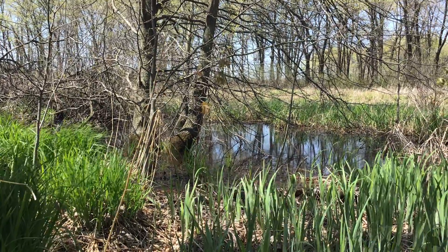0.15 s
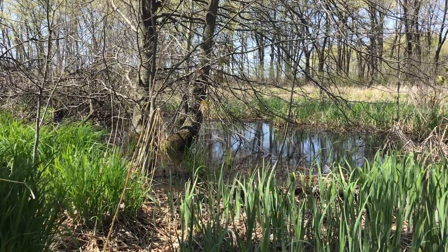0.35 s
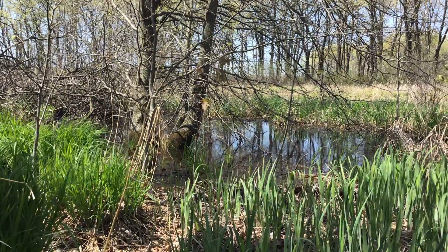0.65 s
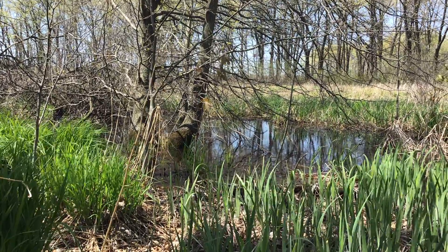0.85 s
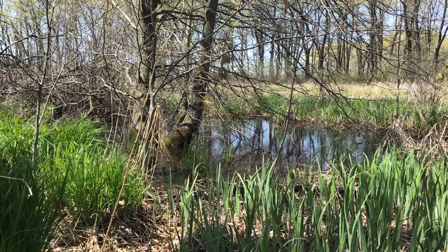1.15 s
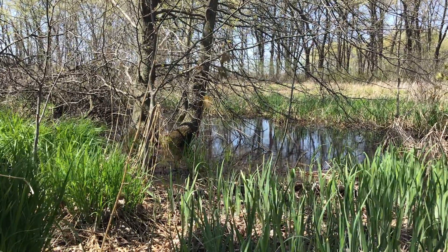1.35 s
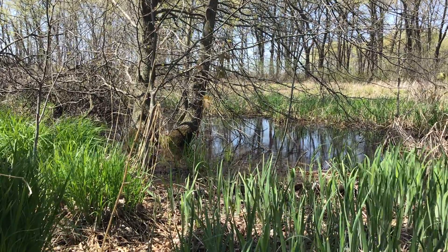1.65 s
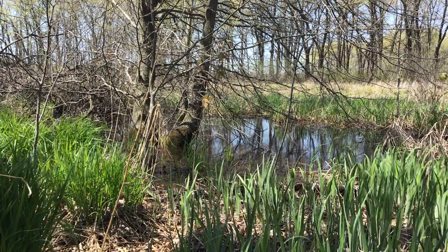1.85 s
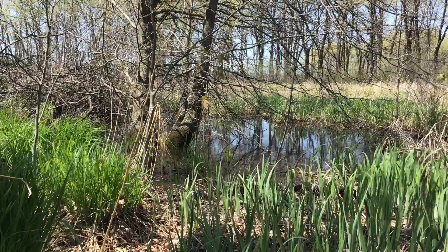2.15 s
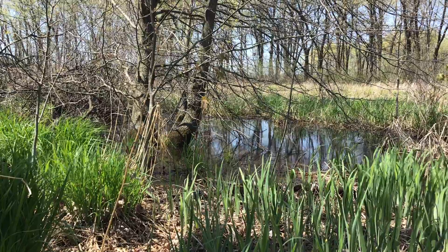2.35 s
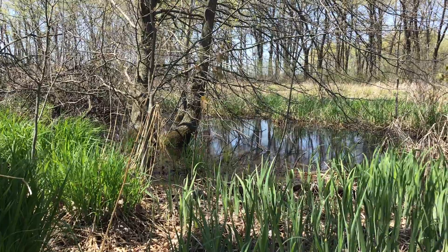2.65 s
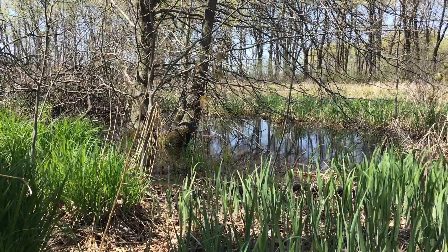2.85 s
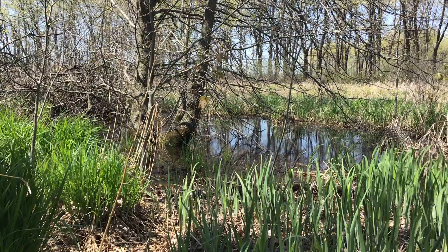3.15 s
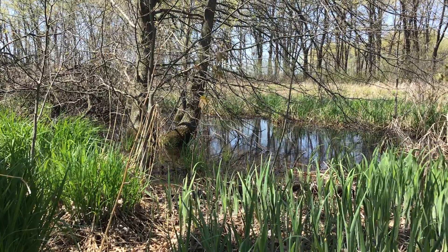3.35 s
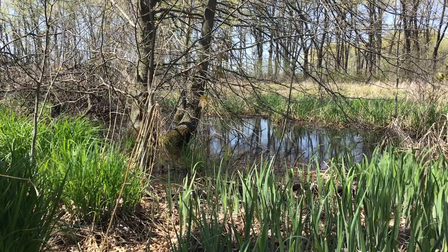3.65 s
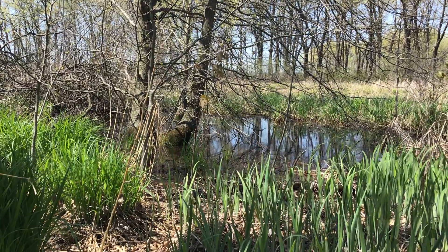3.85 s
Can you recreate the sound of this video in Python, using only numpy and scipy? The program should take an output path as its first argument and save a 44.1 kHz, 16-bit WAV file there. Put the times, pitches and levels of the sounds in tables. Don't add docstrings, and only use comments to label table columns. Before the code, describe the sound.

Outdoors at a pond edge, ratchety frog creaks come three times, each answered by another frog, above a blurred far chorus, brief bird twitters, leaf hiss, faint traffic and low microphone wind, strongest early.

```python
import sys
import numpy as np
from scipy import signal
from scipy.fft import rfft, irfft
from scipy.io import wavfile
from scipy.ndimage import uniform_filter1d

SR = 44100
rng = np.random.default_rng(int(sys.argv[2]) if len(sys.argv) > 2 else 0)


def natural_amplitude(level_db):
    exponent = np.asarray(level_db, float) / 20
    return 10 ** exponent


def put_to_file(sound):
    columns = np.atleast_2d(sound).T
    safe = np.clip(columns, -1, 1)
    whole_steps = np.round(safe * 32767)
    wavfile.write(sys.argv[1], SR, whole_steps.astype(np.int16))


N = 176400
LEAD_S = 0.5


def rms_one(x):
    return x / np.sqrt(np.mean(x ** 2) + 1e-20)


def in_time(rows):
    return np.interp(np.arange(N) / SR, *np.transpose(rows))


def band(x, low_hz, high_hz):
    edges_hz = [low_hz, min(high_hz, .48 * SR)]
    return signal.sosfilt(signal.butter(2, edges_hz, "band", fs=SR, output="sos"), x)


def drift(rate):
    every = 40
    r = np.exp(-2 * np.pi * every * rate / SR)
    slow = signal.lfilter([1], [1, -2 * r, r * r], rng.standard_normal(N // every + 2002))[2000:]
    return np.interp(np.arange(N) / every, np.arange(len(slow)), rms_one(slow))


def add(out, s, sound):
    i = int((s + LEAD_S) * SR)
    out[i:i + len(sound)] += sound


def coloured(spectrum):
    hz, db = np.transpose(spectrum)
    grid = np.log(np.arange(N // 2 + 1) * SR / N + 1)
    gain = natural_amplitude(np.interp(grid, np.log(hz), db, left=-60, right=-60))
    return rms_one(irfft(rfft(rng.standard_normal(N)) * gain, N))


def trees(x, t60):
    t = np.arange(SR // 2) / SR
    tail = rng.standard_normal(len(t)) * natural_amplitude(-60 * t / t60) * np.clip(t / .004, 0, 1)
    return signal.fftconvolve(x, tail / np.sqrt(np.sum(tail ** 2)))[:len(x)]


def glide(hz):
    return np.sin(2 * np.pi * np.cumsum(hz) / SR)


# middle in seconds, half length in seconds, level in dB, centre in Hz.
PUFFS = [(0.046, 0.021, -33, 165), (0.074, 0.028, -32, 110), (0.185, 0.041, -39, 133),
         (0.288, 0.021, -27.5, 110), (0.368, 0.025, -24.5, 110), (0.448, 0.025, -34.5, 186),
         (0.477, 0.031, -26.5, 98.4), (0.544, 0.035, -31.5, 110), (.632, .014, -25, 225),
         (0.647, 0.032, -23, 82), (0.852, 0.047, -31, 76.4), (0.919, 0.034, -32.5, 120),
         (0.984, 0.014, -28, 84), (1.036, 0.027, -33.5, 248), (1.08, 0.081, -27.5, 95.4),
         (1.086, 0.02, -39.5, 420), (1.268, 0.03, -34, 119), (1.412, 0.052, -35.5, 101),
         (1.51, 0.11, -42.5, 144), (1.604, 0.033, -32, 127), (1.686, 0.026, -28.5, 88),
         (1.747, 0.019, -32.5, 110), (1.824, 0.037, -39, 90), (2.26, 0.025, -35.5, 187),
         (2.299, 0.018, -31.5, 90), (2.389, 0.024, -24, 110), (2.421, 0.0088, -26, 210),
         (2.468, 0.023, -27.5, 83), (3.472, 0.021, -35.5, 89), (3.557, 0.018, -26.5, 108),
         (0.628, 0.0086, -39, 520), (0.641, 0.013, -38.5, 400), (2.11, 0.036, -46.5, 168),
         (3.056, 0.042, -42.5, 75), (3.143, .025, -43, 85), (3.99, 0.026, -38.5, 70)]
# time in seconds, level in dB.
BREEZE = [(0, -39), (.6, -46.5), (.75, -47), (.85, -55), (1.0, -39), (1.35, -51.5), (1.7, -53), (2.0, -54),
          (2.4, -49), (2.56, -54), (2.7, -54.5), (3.1, -51), (3.4, -53.5), (4, -49.5)]


def wind():
    breeze_tilt_db, lump_db, knee_hz = -8, 3, 110
    below_db, above_db, top_hz = 5, 10, 744
    t, out = np.arange(N) / SR, np.zeros(N)
    lumps, breeze_db = drift(21.4), in_time(BREEZE)
    for low in 40 * 2 ** np.arange(0, 4.5, .5):
        middle_hz = low * 2 ** .25
        noise = band(rng.standard_normal(N + SR), low, low * 2 ** .5)[SR:]
        envelope = np.sqrt(uniform_filter1d(noise ** 2, size=int(3 * SR / low)))
        noise = rms_one(noise / (envelope + .2 * noise.std()))
        octaves = max(np.log2(middle_hz / knee_hz), 0)
        unrest_db = lump_db * 2 * np.tanh((lumps + 0.31 * drift(29)) / 2)
        power = natural_amplitude(2 * (breeze_db + breeze_tilt_db * octaves + unrest_db))
        for middle, half, db, hz in PUFFS:
            away = np.log2(middle_hz / hz)
            loss_db = above_db * away ** 1.79 if away > 0 else below_db * away ** 2
            near = slice(max(int((middle - 3 * half) * SR), 0), int((middle + 3 * half) * SR))
            power[near] += natural_amplitude(2 * (db - loss_db)) * np.exp(-2 * ((t[near] - middle) / half) ** 2)
        out += natural_amplitude(-7.5) * np.sqrt(power) * noise
    return signal.sosfilt(signal.butter(8, top_hz, fs=SR, output="sos"), out)


# frequency in Hz, density in dB per Hz.
TRAFFIC = [(35, -34), (60, -0.5), (114, -2.5), (226, -13), (346, -16), (401, -16.5), (613, -18),
           (3000, -32), (3900, -36), (6600, -120)]


def far_traffic():
    level_db = -51 + 0.39 * drift(1.4)
    return natural_amplitude(level_db) * coloured(TRAFFIC)


# frequency in Hz, density in dB per Hz.
HISS = [(1500, -20), (3000, -4), (4300, -0.5), (6000, -6), (7000, -8), (9500, -7.5), (12000, -14),
        (16000, -12)]
# time in seconds, gain in dB.
LEAVES = [(0, 3.5), (.9, 1), (1.1, -0.4), (4, -1)]


def leaf_hiss():
    hiss = coloured(HISS)
    high = band(hiss, 7000, 20000)
    rustle = natural_amplitude(in_time(LEAVES) + .8 * drift(25)) - 1
    return natural_amplitude(-71.5 + 0.2 * drift(7.1)) * (hiss + rustle * high)


def pulse(db, hz, luck, ring=1.0):
    rise_s, fall_s, sag_hz, sag_s = 0.0021, 0.0015, 653, 0.0014
    tail_share, tail_s = 0.58, 0.0049
    t = np.arange(1300) / SR
    swell = np.sin(np.pi / 2 * np.minimum(t / rise_s, 1)) ** 2
    late = np.maximum(t - rise_s, 0)
    turns = hz * t + sag_hz * sag_s * (1 - np.exp(-t / sag_s))
    beat = (1 - tail_share) * np.exp(-(late / fall_s) ** 2)
    tail = tail_share * np.exp(-late / (ring * tail_s))
    overtone = natural_amplitude(-18 + 1.8 * luck[0]) * np.exp(-late / 0.00045)
    overtone = overtone * np.sin(2 * np.pi * (5250 + 70 * luck[1]) * t)
    return natural_amplitude(db) * swell * ((beat + tail) * np.sin(2 * np.pi * turns) + overtone)


def sac_pitch(s, end_s, call_s, low_hz, rise_hz):
    part = max(1 - (end_s - s) / call_s, 0)
    return low_hz + rise_hz * part ** 2.15


# start in seconds, length in seconds, level in dB, first pitch in Hz, last pitch in Hz.
FAR_CALLS = [
    (-.3, .55, -59, 3200, 3590),
    (0.779, .25, -64.5, 3420, 3360),
    (1.02, .25, -60, 3320, 3660),
    (1.169, .29, -59, 3320, 3560),
    (2.018, 0.48, -64.5, 3270, 3450),
    (2.44, .26, -57.5, 3520, 3720),
    (2.959, .36, -61, 3160, 3330),
    (3.26, .25, -65, 3370, 3300),
    (3.561, 0.43, -62, 3410, 3630),
]


def far_frogs():
    gap_s, slowing, spread_hz = .011, .5, 75
    out = np.zeros(N + 2 * SR)
    luck = rng.standard_normal((len(FAR_CALLS), 50, 3))
    for (start, length, db, first_hz, last_hz), draws in zip(FAR_CALLS, luck):
        s = 0
        for timing, strength, tuning in draws:
            part = s / length
            if part < 1:
                level_db = db + 4 * np.log10(np.sin(np.pi * part) + 0.098) + 1.4 * strength
                hz = first_hz + (last_hz - first_hz) * part + spread_hz * tuning
                add(out, start + s, pulse(level_db, hz, (tuning, timing), 0.69))
            s += gap_s * (1 + slowing * part) * np.exp(.3 * timing)
    out = out[:N + SR]
    return natural_amplitude(-5.5) * out + trees(out, 0.28)


# time in seconds, peak in dB, pitch in Hz.
THIRD = [(.006, -55, 3500), (.0278, -55, 3440), (.0443, -56, 3560), (.0657, -55.5, 3630),
         (.1296, -55, 3510), (.182, -61, 3560), (1.1674, -60, 3700), (1.2787, -62, 3500),
         (1.3366, -61, 3560), (1.368, -57, 3520), (1.4044, -58, 3560), (1.4383, -58, 3560),
         (2.511, -52, 3640), (2.5649, -57, 3600), (2.6397, -67, 3650), (2.6627, -67, 3800),
         (2.7026, -67, 3700), (3.7196, -60, 3600), (3.7401, -61, 3600), (3.772, -60, 3460),
         (3.8309, -59, 3570), (3.8488, -62, 3600), (3.9281, -64, 3650), (3.9541, -62, 3600),
         (3.972, -57, 3860)]


def third_frog():
    out = np.zeros(N + SR)
    for s, db, hz in THIRD:
        add(out, s, pulse(db, hz, rng.standard_normal(2)))
    return out


# start in seconds, length in seconds, level in dB, centre in Hz,
# width in Hz.
RASPS = [(1.1, 0.02, -63.5, 4300, 2600), (1.058, 0.013, -59.5, 4200, 650), (1.085, 0.05, -68, 3940, 1400),
         (1.076, .014, -61, 2540, 710), (.855, 0.015, -71, 5400, 900), (1.033, 0.004, -74, 11000, 4000),
         (.77, 0.035, -76, 10000, 4000), (1.597, .004, -72, 8800, 2500), (3.1, 0.099, -71, 4500, 1800),
         (0.302, 0.005, -69, 10600, 3500), (.359, .004, -66.5, 9000, 2000), (1.158, .006, -72, 7800, 1200),
         (.86, .03, -77, 13500, 2800), (1.57, 0.066, -79, 7000, 2500)]


def rasps_and_ticks():
    out = np.zeros(N + SR)
    for start, length, db, hz, width_hz in RASPS:
        n = int(np.clip(length, .003, .1) * SR)
        swell = np.sin(np.linspace(0, np.pi, n)) ** 0.31
        noise = rms_one(band(rng.standard_normal(6000), hz - width_hz / 2, hz + width_hz / 2))
        add(out, start, natural_amplitude(db) * swell * noise[-n:])
    return out


# time in seconds, peak in dB.
CALL_A = [(0.338, -52), (0.3686, -53), (0.4, -51), (0.4337, -47.5), (0.4699, -45), (0.5086, -42.5),
          (0.5498, -44), (0.5938, -41), (0.6433, -39), (0.692, -40), (0.7415, -42.5), (0.7863, -46.5)]
CALL_B = [(1.552, -50), (1.5828, -50.5), (1.6144, -47), (1.648, -48.5), (1.685, -49), (1.724, -46.5),
          (1.7657, -43), (1.8107, -41), (1.8586, -38.5), (1.909, -39), (1.959, -42), (2.0078, -42)]
CALL_C = [
    (2.948, -53),
    (2.988, -53),
    (3.0317, -48.5),
    (3.0789, -49.5),
    (3.1313, -48),
    (3.1828, -45),
    (3.2345, -47.5),
    (3.282, -54.5),
]


def near_frog():
    out = np.zeros(N + SR)
    for call in CALL_A, CALL_B, CALL_C:
        loudest = max(db for s, db in call)
        for s, db in call:
            hz = sac_pitch(s, call[-1][0], 0.54, 3148, 345)
            ring = .5 + 0.76 * natural_amplitude(db - loudest) / 2
            add(out, s, pulse(db, hz, rng.standard_normal(2), ring))
    return out


# time in seconds, peak in dB.
ANSWERS = [
    [(0.9849, -63), (1.0113, -59), (1.0333, -60), (1.0707, -52), (1.1086, -57), (1.149, -55), (1.1964, -60),
     (1.2313, -51.5)],
    [(2.1448, -67), (2.1688, -63), (2.1937, -65), (2.2192, -59), (2.2486, -55), (2.281, -57), (2.3174, -54),
     (2.3569, -50), (2.3993, -52), (2.4412, -48.5), (2.4786, -53)],
    [(3.4288, -61), (3.4562, -58), (3.4871, -66), (3.5196, -57.5), (3.557, -55), (3.5984, -58),
     (3.6428, -53), (3.6847, -55)],
]


def answering_frog():
    out = np.zeros(N + SR)
    for call in ANSWERS:
        for s, db in call:
            hz = sac_pitch(s, call[-1][0], 0.38, 3320, 192)
            add(out, s, pulse(db, hz, rng.standard_normal(2), 0.99))
    return out


# delay in seconds, level in dB.
REED_ECHOES = [
    (.017, -17),
    (.024, -19),
    (.037, -16.5),
    (.043, -14.5),
]


def pond_echoes(frogs):
    dull = band(frogs, 3200, 3470)
    echoes = sum(natural_amplitude(db) * np.roll(dull, int(s * SR)) for s, db in REED_ECHOES)
    return frogs + echoes + natural_amplitude(-11) * trees(frogs, 0.89)


def sweep(length, db, first_hz, last_hz):
    part = np.linspace(0, 1, int(length * SR))
    return natural_amplitude(db) * np.sin(np.pi * part) * glide(first_hz + (last_hz - first_hz) * part)


# start in seconds, length in seconds, level in dB, first middle in Hz, last middle in Hz.
TRILLS = [
    (2.738, .044, -62, 5450, 5250),
    (2.794, .024, -61.5, 4650, 4500),
    (2.820, .022, -62.5, 5130, 4800),
    (2.893, .007, -64.5, 5000, 5000),
    (2.196, .024, -69, 4600, 4300),
    (2.562, .022, -66, 4800, 4700),
]
# start in seconds, length in seconds, level in dB, first pitch in Hz, last in Hz.
CHIRPS = [
    (1.065, 0.0083, -57.5, 4230, 4880),
    (1.067, 0.0092, -52.5, 3730, 4200),
    (1.077, .006, -50, 4150, 3150),
    (2.516, 0.011, -65.5, 4250, 4350),
    (2.586, .007, -63, 6300, 4500),
    (2.591, 0.0085, -64, 7100, 4800),
    (2.6, .007, -63, 6000, 4600),
    (2.607, .007, -62, 5700, 4700),
    (2.128, .068, -69, 5100, 4100),
]


def twitter():
    gap_s, sweep_hz = 0.0068, 1410
    uneven_db, uneven_hz, uneven_s = 2.5, 140, .001
    out = np.zeros(N + SR)
    for start, length, db, first_hz, last_hz in TRILLS:
        for s in np.arange(0, length, gap_s):
            timing, strength, tuning = rng.standard_normal(3)
            hz = first_hz + (last_hz - first_hz) * s / length + uneven_hz * tuning
            note = sweep(gap_s, db + uneven_db * strength, hz + sweep_hz / 2, hz - sweep_hz / 2)
            add(out, start + s + uneven_s * timing, note)
    out = natural_amplitude(-2.5) * out + natural_amplitude(-5.5) * trees(out, .06)
    for start, *shape in CHIRPS:
        add(out, start, sweep(*shape))
    return out


# start in seconds, length in seconds, level in dB, first pitch in Hz, last pitch in Hz.
WHISTLES = [
    (2.15, 0.027, -62, 2445, 2450),
    (2.188, 0.045, -65, 2440, 2450),
    (2.124, 0.07, -76, 5000, 4150),
    (3.145, 0.042, -73, 4700, 4640),
    (3.546, 0.092, -65.5, 4070, 3900),
    (3.607, 0.044, -67, 3920, 3700),
]


def whistles():
    out = np.zeros(N + SR)
    for start, length, db, first_hz, last_hz in WHISTLES:
        part = np.linspace(0, 1, int(length * SR))
        wobble = 2 * uniform_filter1d(rng.standard_normal(SR // 4), size=100)[:len(part)]
        hz = first_hz + (last_hz - first_hz) * (part + wobble)
        add(out, start, natural_amplitude(db) * np.sin(np.pi * part) ** 0.32 * glide(hz))
    flutter_db = signal.lfilter([.02], [1, -.98], 10 * rng.standard_normal(len(out)))
    return out * natural_amplitude(flutter_db)


def scene():
    background = wind() + far_traffic() + leaf_hiss()
    frogs = far_frogs() + pond_echoes(third_frog() + near_frog() + answering_frog())
    birds = rasps_and_ticks() + whistles()
    birds = birds + natural_amplitude(-9) * trees(birds, .15)
    voices = frogs + birds + twitter()
    lead = int(LEAD_S * SR)
    return (voices[lead:lead + N] + background)[None]


def roll_off(x):
    return signal.sosfilt(signal.butter(12, 15800, fs=SR, output="sos"), x)


def record(dry):
    x = signal.sosfilt(signal.butter(6, 59.4, "high", fs=SR, output="sos"), dry)
    mix = signal.sosfilt(signal.cheby2(16, 50, 15950, fs=SR, output="sos"), x)
    return roll_off(mix)


dry = scene()
out = record(dry)
put_to_file(out)
```